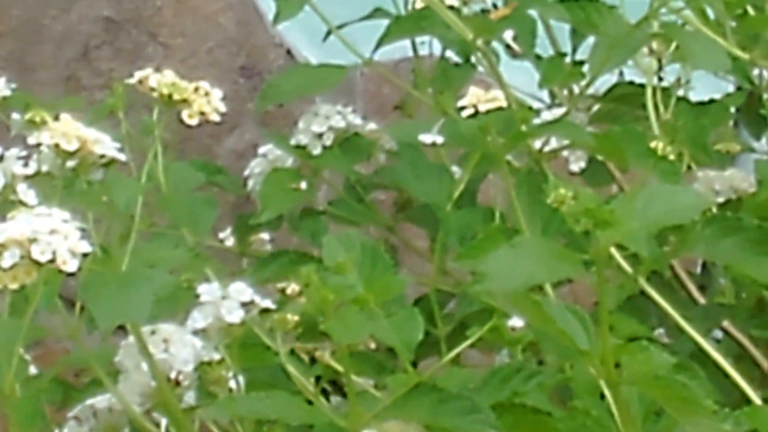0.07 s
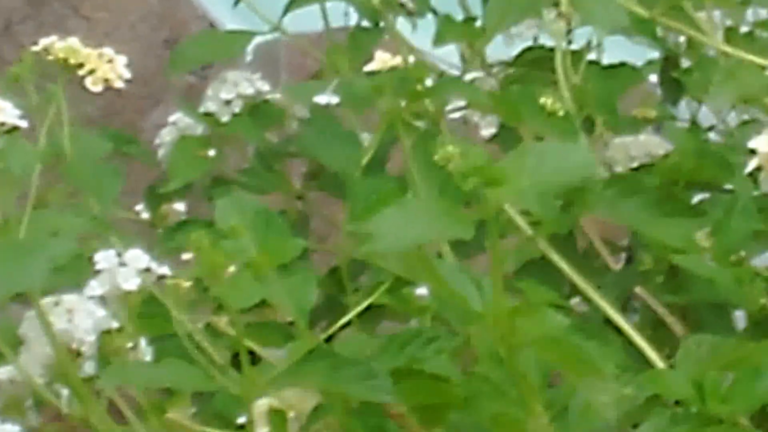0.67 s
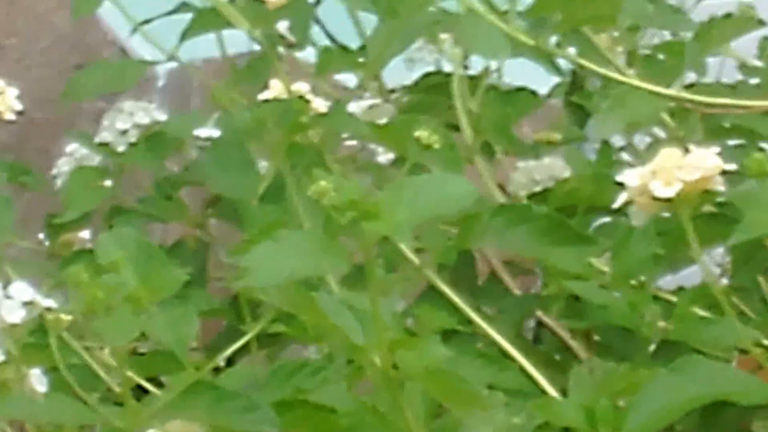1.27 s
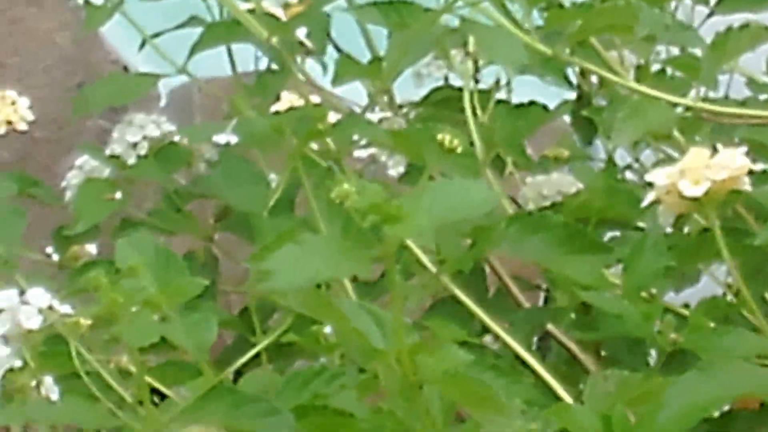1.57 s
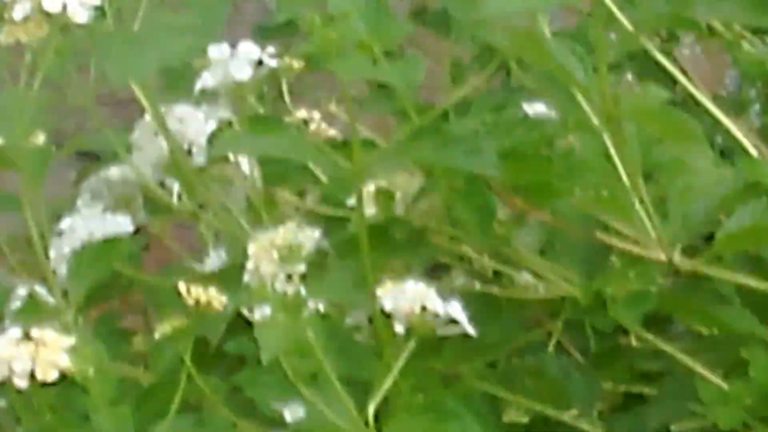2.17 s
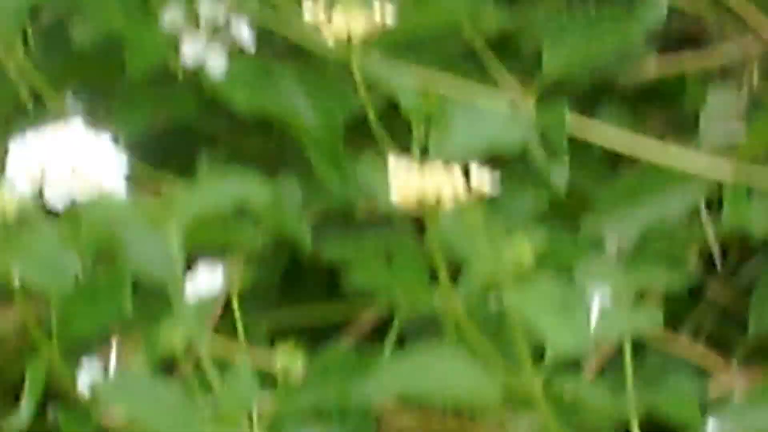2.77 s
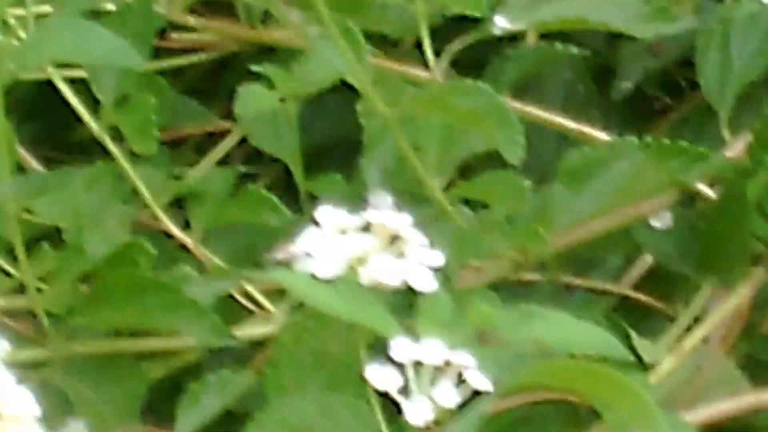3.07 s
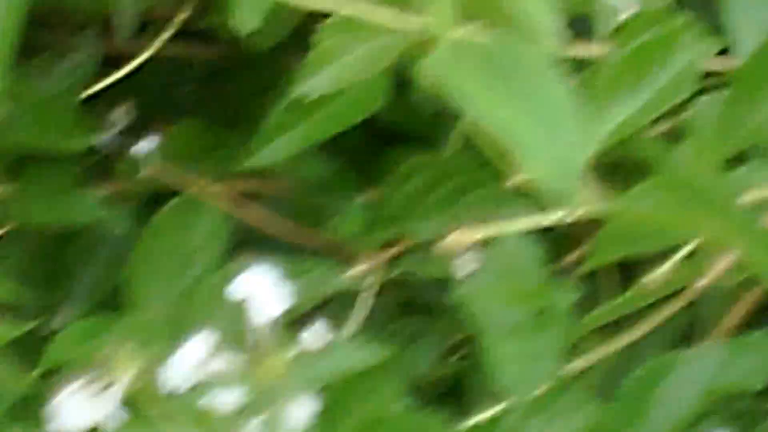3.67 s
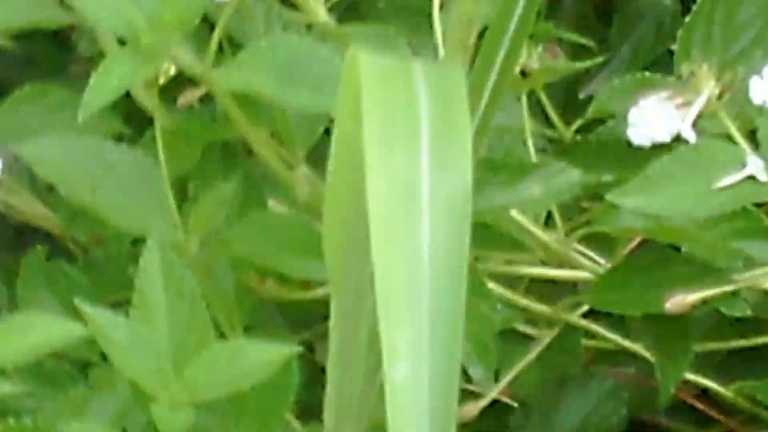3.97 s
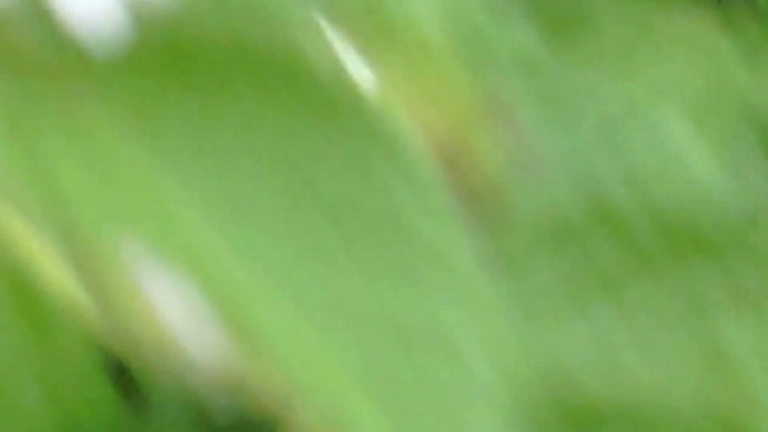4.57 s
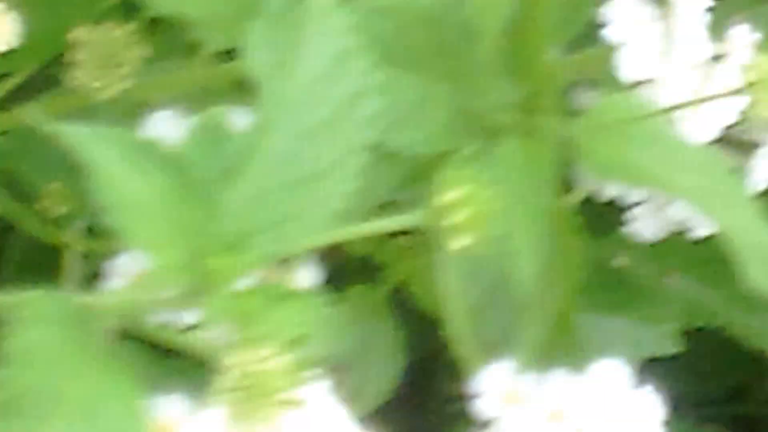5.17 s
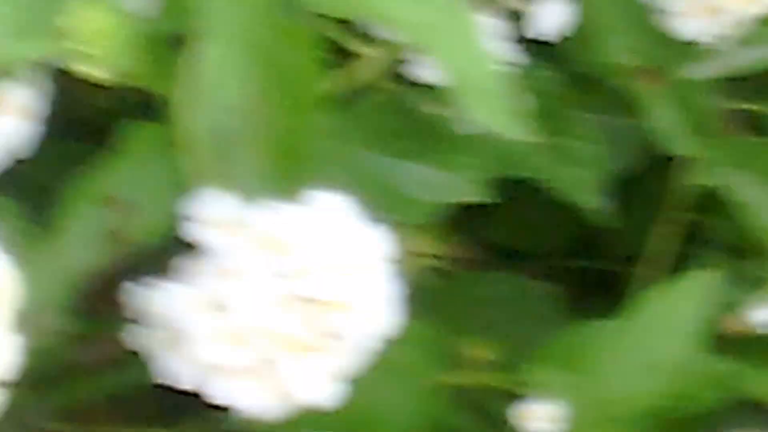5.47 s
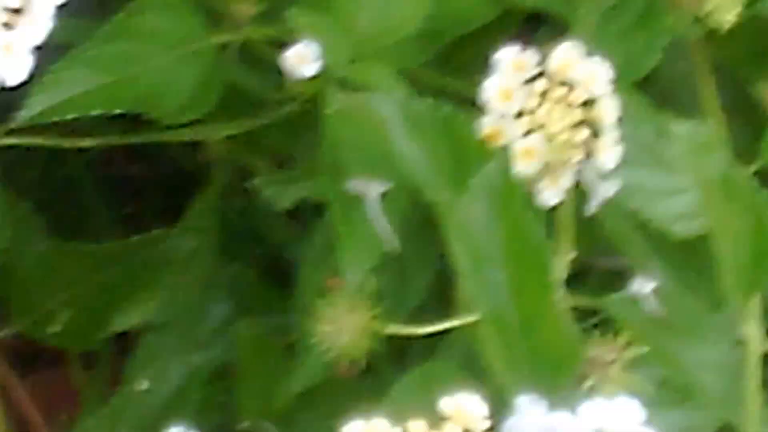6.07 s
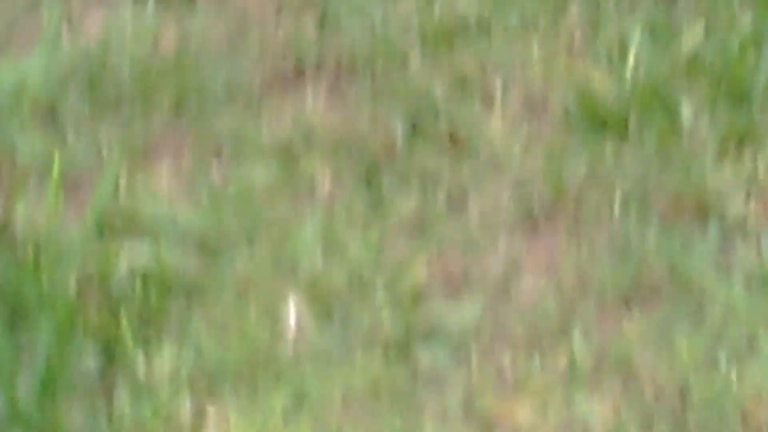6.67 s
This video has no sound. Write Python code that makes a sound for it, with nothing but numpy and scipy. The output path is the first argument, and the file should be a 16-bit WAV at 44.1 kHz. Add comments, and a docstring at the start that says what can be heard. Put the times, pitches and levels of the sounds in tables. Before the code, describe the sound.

A quiet garden with a steady, low distant roar under a thin hiss. From the start until about 3.8 seconds, a soft, papery insect buzz comes in slow swells, each growing gradually and stopping quickly. Far birds give faint thin slurs, and one repeats a high hooked note six times from about 1.4 to 1.9 seconds. At 2.4 seconds a near bird gives a short, arched call, raspy at both ends, the loudest sound. From 4.1 seconds a songbird sings a level whistle, a rising one and a long falling one, then quick downward sweeps until 5.4. The near bird calls again at 5.1, somewhat softer. Faint, scratchy chips fall deep in the foliage from 5.4 to 6.4 seconds, and a finger knocks the camera once at 5.6. A last faint slur comes near 6.6. Leaves and walls give the birds a short tail.

```python
"""A garden, with a low distant roar under a thin hiss. An insect buzzes in slow swells through the
first half while far birds slur and twitter. A near bird gives two loud arched calls, harmonics
coloured by its throat. A songbird whistles and runs into a trill, chips fall deep in the foliage,
and fingers knock the camera once. Leaves and walls scatter the birds into a short tail."""
import sys
import numpy as np
from scipy import signal
from scipy.fft import rfft, irfft
from scipy.io import wavfile

SR = 44100
rng = np.random.default_rng(int(sys.argv[2]) if len(sys.argv) > 2 else 0)


def file_out(sig):
    """Save sig as 16-bit WAV at sys.argv[1]."""
    # one column per channel
    cols = np.atleast_2d(sig).T
    # limit, then scale
    lim = np.clip(cols, -1, 1)
    pcm = np.round(lim * 32767).astype(np.int16)
    wavfile.write(sys.argv[1], SR, pcm)


N = 305172
TIME = np.arange(N) / SR
YARD_T60 = .5  # seconds for the garden's tail to fall 60 dB


def amp(db):
    """Decibels to gain."""
    return 10 ** (np.asarray(db) / 20)


def unit(x):
    """Scales to rms 1."""
    return x / np.sqrt(np.mean(x ** 2) + 1e-20)


def curve_db(curve, hz):
    """The level of an EQ curve at a frequency, on a log-frequency axis."""
    points_hz, points_db = np.transpose(curve)
    return np.interp(np.log(hz + 1), np.log(points_hz + 1), points_db)


def coloured_noise(size, curve):
    """Noise shaped by an EQ curve, at rms 1."""
    gain = amp(curve_db(curve, np.fft.rfftfreq(size, 1 / SR)))
    return unit(irfft(rfft(rng.standard_normal(size)) * gain, size))


def wander(size, rate_hz):
    """Smooth random drift up to a rate, at about rms 1."""
    padded = size + SR
    hz = np.fft.rfftfreq(padded, 1 / SR)
    spectrum = rfft(rng.standard_normal(padded)) / (1 + (hz / rate_hz) ** 4)
    return unit(irfft(spectrum, padded))[:size]


def add(mix, start_s, sound):
    """Mixes a sound in at a time."""
    part = mix[max(round(start_s * SR), 0):][:len(sound)]
    part += sound[:len(part)]


def whistle(hz, waver):
    """A nearly pure tone with a slightly unsteady pitch."""
    unsteady_hz = hz * (1 + waver * wander(len(hz), 150))
    return np.sqrt(2) * np.sin(2 * np.pi * np.cumsum(unsteady_hz) / SR)


def foliage(x, t60):
    """Scatter from leaves and walls: sparse reflections that build up and die away."""
    t = TIME[:SR]
    taps = rng.standard_normal(SR) * (rng.random(SR) < .06)
    taps *= amp(-60 * t / t60) * (1 - np.exp(-t / .005))
    return signal.fftconvolve(x, taps / np.linalg.norm(taps))[:N]


def thicket(x, share, t60):
    """A sound heard through leaves: a share of its power arrives by many short detours."""
    return np.sqrt(1 - share) * x + np.sqrt(share) * foliage(x, t60)


# The tone of the background bed. Each row: frequency in Hz, relative level in dB.
ROAR_EQ = [(20, -29.5), (50, -21.5), (100, -20), (160, -13), (250, -8), (350, -3.5), (480, -2.5),
           (650, -7.5), (950, -15.5), (1350, -14.5), (2300, -21), (4200, -21.5), (6500, -22.5), (9600, -24)]


def distant_roar(level_db=-55.5, drift_db=.06):
    """The low roar of far surroundings under a thin, even hiss."""
    return amp(level_db + drift_db * wander(N, 7.7)) * coloured_noise(N, ROAR_EQ)


# The insect's phrasing. Each row: end of a swell in seconds, level it climbs towards in dB.
INSECT_SWELLS = [(.117, -53), (.76, -53.5), (1.35, -54), (1.969, -53), (2.586, -52), (3.162, -54),
                 (3.8, -57)]
# Its bright, papery tone. Each row: frequency in Hz, relative level in dB.
INSECT_EQ = [(1200, -35), (2000, -7.5), (2600, -1), (3100, -8.5), (3600, -1), (5000, -1.5), (6500, -1.5),
             (7400, -4), (7900, -17), (8800, -1.5), (9600, -3.5)]


def insect(swell_s=.37, rise_s=.11, fall_s=.01, grain=.11):
    """A grainy wide-band buzz among leaves: each swell grows gradually and stops quickly."""
    effort = np.zeros(N)
    for end, db in INSECT_SWELLS:
        attack = 1 - np.exp(-np.maximum(TIME - end + swell_s, 0) / rise_s)
        release = (1 - np.tanh((TIME - end) / fall_s)) / 2
        effort += amp(db) * attack * release
    buzz = effort * coloured_noise(N, INSECT_EQ) * (1 + grain * wander(N, 250))
    return buzz + amp(-2.5) * foliage(buzz, t60=.23)


# Faint slurs dotted through the scene. Each row: start in seconds, length in seconds,
# first pitch in Hz, last pitch in Hz, level in dB.
FAR_SLURS = [ (0.567, 0.333, 1344, 1368, -67.5), (0.919, 0.14, 7050, 6600, -68),
             (1.0, .06, 6430, 4680, -69), (1.96, 0.13, 5800, 4050, -62.5), (2.071, 0.069, 7030, 6000, -63),
             (2.072, 0.091, 3250, 2950, -68.5), (2.223, .12, 5650, 4120, -62), (3.14, .13, 6400, 6150, -68),
             (4.442, .098, 2850, 2430, -71), (6.616, 0.11, 4580, 3870, -69)]


def far_birds(wet_db=-7):
    """Thin whistles through leaves, each an even glide between two pitches."""
    out = np.zeros(N)
    for start, length, first_hz, last_hz, db in FAR_SLURS:
        hz = np.geomspace(first_hz, last_hz, int(length * SR))
        add(out, start, amp(db) * whistle(hz, waver=.018) * signal.windows.tukey(len(hz), .4))
    return thicket(out, share=.46, t60=.18) + amp(wet_db) * foliage(out, YARD_T60)


def twitter(start_s=1.365, step_s=.0865, note_s=.055, first_db=-67, growth_db=1.2, wet_db=-8):
    """A far bird repeats one hooked note at an even pace, a little louder each time."""
    out = np.zeros(N)
    progress = np.linspace(0, 1, int(note_s * SR))
    hz = 5570 - 1880 * progress ** 5  # held high, then hooked downwards
    for k in range(6):
        note = whistle(hz, waver=.027) * signal.windows.tukey(len(hz), .4)
        add(out, start_s + k * step_s, amp(first_db + k * growth_db) * note)
    return thicket(out, share=.28, t60=.17) + amp(wet_db) * foliage(out, YARD_T60)


def call_shape(rise, hold, fall, top_hz, level_db, accent_db):
    """Pitch, level and roughness of a near call: raspy scoop, clean top, break and rough slide."""
    sag_hz_per_s, break_hz, slide_hz_per_s = 600, 99.5, 8000
    onset_db, hold_db_per_s, release_db = -12.5, -72, -6.5
    t = np.arange(0, rise + hold + fall, 1 / SR)
    scoop = np.maximum(1 - t / rise, 0)
    bend = np.sin(np.pi / 2 * scoop)
    held_s = np.clip(t - rise, 0, hold)
    slid_s = np.maximum(t - rise - hold, 0)
    broken = 1 - np.exp(-slid_s / .003)
    slide = slid_s / fall
    hz = top_hz * (1 - .26 * bend ** 2)
    hz -= sag_hz_per_s * held_s + break_hz * broken + slide_hz_per_s * slid_s
    # a push just before the break, part of which stays through the slide
    accent = np.exp(-np.abs((t - rise - hold + .0098) / .011) ** 4)
    # sliding through 1605 Hz, the voice rings louder and cleaner
    ring_db = 6.5 * broken * np.exp(-((hz - 1605) / 28) ** 2)
    db = level_db + onset_db * scoop ** 2.1 + hold_db_per_s * held_s + release_db * slide ** 3
    db += accent_db * np.maximum(accent, .26 * broken) + ring_db
    rough = .99 * bend + .041 * (1 - accent) + .092 * broken + .568 * slide ** 2
    return hz, db, np.clip(rough / amp(ring_db) ** 2, 0, 1)


# The two foreground calls. Each row: start, rise, hold and fall in seconds, top pitch in Hz,
# base level in dB, accent in dB, trim on the fundamental in dB, trim on harmonics 4 to 7 in dB.
NEAR_CALLS = [(2.403, .04, .055, 0.058, 1906, -35.5, 13, -2, 0),
              (5.145, .054, .026, 0.075, 1913, -38, 4, 1, -3.5)]
# The resonances of the bird's throat. Each row: frequency in Hz, relative level in dB.
THROAT_EQ = [(1000, -22), (1500, -10), (1900, -14), (2400, -22.5), (3100, 0.5), (3800, -0.5), (4350, -3.5),
             (4900, -25), (5700, -15.5), (6400, -20), (7500, -21.5), (9500, -25)]
# Slaps off the ground and walls. Each row: delay in seconds, gain in dB.
SLAP_ECHOES = [(.0047, -20), (.0113, -18), (.018, -15), (.118, -26)]


def near_bird(jitter=.028, smear=1.47, flutter=.71, rasp=.65, leaves_db=-13, yard_db=-11):
    """Arched calls, clean on top and raspy at both ends; the throat favours the second harmonic."""
    out = np.zeros(N)
    for start, rise, hold, fall, top_hz, level_db, accent_db, low_db, high_db in NEAR_CALLS:
        hz, db, rough = call_shape(rise, hold, fall, top_hz, level_db, accent_db)
        size = len(hz)
        phase = 2 * np.pi * np.cumsum(hz * (1 + jitter * rough * wander(size, 350))) / SR
        # the louder the call, the more the throat's main resonance stands out
        depth = np.clip(.84 + .017 * (db + 31), .75, 1.25)
        tone, power = np.zeros(size), np.zeros(size)
        for k, trim_db in enumerate([low_db, 0, 0] + [high_db] * 4, start=1):
            gain = amp(depth * curve_db(THROAT_EQ, k * hz) + trim_db)
            # uneven cycles blur the high harmonics first
            blur = smear * np.sqrt(rough) * max(k - 2, .3) * wander(size, 520)
            tone += gain * np.sin(k * phase + blur)
            power += gain ** 2 / 2
        tone /= np.sqrt(power)
        tone *= 1 + flutter * np.sqrt(rough) * wander(size, 220)
        noise_gain = rasp * rough
        voice = np.sqrt(1 - noise_gain ** 2) * tone + noise_gain * coloured_noise(size, THROAT_EQ)
        add(out, start, amp(db) * voice * signal.windows.tukey(size, .1))
    heard = out + amp(leaves_db) * foliage(out, t60=.16) + amp(yard_db) * foliage(out, YARD_T60)
    for delay, db in SLAP_ECHOES:
        add(heard, delay, amp(db) * out)
    return heard


# The songbird's phrase. Each row: start and length in seconds, first, knee and last pitch in Hz,
# time to the knee and settling time in seconds, level in dB, share scattered by leaves from 0 to 1.
SONG_NOTES = [ (4.104, 0.18, 3970, 3973, 3926, 0.026, 0.034, -55.5, 0.06),
              (4.371, 0.24, 2730, 3200, 4175, .028, 0.032, -50.5, 0.16),
              (4.665, 0.21, 6010, 4660, 2725, 0.1, .052, -50, 0.48),
              (4.96, 0.061, 6300, 5570, 3720, .015, 0.017, -51.5, .75),
              (5.067, 0.052, 6420, 5420, 3680, .014, 0.012, -50.5, 0.6),
              (5.335, .058, 6280, 5360, 3590, 0.015, 0.018, -51, 0.8)]


def songbird(attack_share=.18, release_share=.16, wet_db=-8):
    """A level whistle, a rising one, a long fall, then quick sweeps: each bends and settles."""
    out = np.zeros(N)
    for start, length, first_hz, knee_hz, last_hz, knee_s, settle_s, db, scattered in SONG_NOTES:
        t = np.arange(0, length, 1 / SR)
        glide_hz = np.interp(t, [0, knee_s], [first_hz, knee_hz])
        settling = np.exp(-(np.maximum(t - knee_s, 0) / settle_s) ** 1.5)
        hz = last_hz + (glide_hz - last_hz) * settling
        envelope = np.interp(t / length, [0, attack_share, 1 - release_share, 1], [0, 1, 1, 0])
        note = np.zeros(N)
        add(note, start, amp(db) * envelope * whistle(hz, waver=.0038))
        out += thicket(note, scattered, t60=.24)
    return out + amp(wet_db) * foliage(out, YARD_T60)


# A flurry of bird chips deep in the foliage. Each row: start in seconds, top pitch in Hz, level in dB.
HIDDEN_CHIPS = [ (5.419, 6180, -55.5), (5.478, 6010, -56), (5.635, 6120, -57), (5.774, 6260, -57.5),
                (5.92, 5980, -55.5), (6.08, 5690, -58.5), (6.125, 6300, -55), (6.288, 5600, -60.5),
                (6.324, 6500, -56.5)]


def chips(length_s=.044, fall_ratio=.65, wet_db=-7):
    """Fast, scratchy downward sweeps that arrive mostly as scatter."""
    out = np.zeros(N)
    for start, top_hz, db in HIDDEN_CHIPS:
        hz = top_hz * np.geomspace(1, fall_ratio, int(length_s * SR))
        add(out, start, amp(db) * whistle(hz, waver=.0645) * signal.windows.tukey(len(hz), .6))
    return thicket(out, share=.65, t60=.25) + amp(wet_db) * foliage(out, YARD_T60)


# Two taps close enough to land as one knock. Each row: start in seconds, level in dB, pitch factor.
FINGER_TAPS = [(5.5835, -50, 1.85), (5.6007, -38.5, 1.01)]
# The ring of the case. Each row: frequency in Hz before the pitch factor, relative level in dB,
# time to fall 60 dB in seconds.
CASE_MODES = [(683, 3.5, 0.021), (538, -3, .02), (1250, -12, .012), (2720, -11, 0.011), (3930, -7, 0.013)]


def camera_knock(attack_s=.00031):
    """Fingers tap the camera case, which rings for a few cycles."""
    out, t = np.zeros(N), TIME[:2000]
    attack = 1 - np.exp(-t / attack_s)
    for start, db, pitch_factor in FINGER_TAPS:
        ring = sum(amp(mode_db - 60 * t / t60) * np.sin(2 * np.pi * hz * pitch_factor * t)
                   for hz, mode_db, t60 in CASE_MODES)
        add(out, start, -amp(db) * ring * attack)
    return out


def scene():
    """The whole garden at one microphone."""
    birds = near_bird() + songbird() + far_birds() + twitter() + chips()
    return (birds + insect() + distant_roar() + camera_knock())[None]


def record(dry, notch_hz=8170, notch_width_hz=260, cutoff_hz=9680):
    """A small camera with a narrow notch in the treble and a steep band limit."""
    hz = np.fft.rfftfreq(N, 1 / SR)
    notch = 1 - np.exp(-((hz - notch_hz) / notch_width_hz) ** 2)
    notched = irfft(rfft(dry) * notch, N)
    lowpass = signal.firwin(1023, cutoff_hz, window=("kaiser", 9), fs=SR)
    return signal.oaconvolve(notched, lowpass[None], "same")


dry = scene()
out = record(dry)
file_out(out)
```